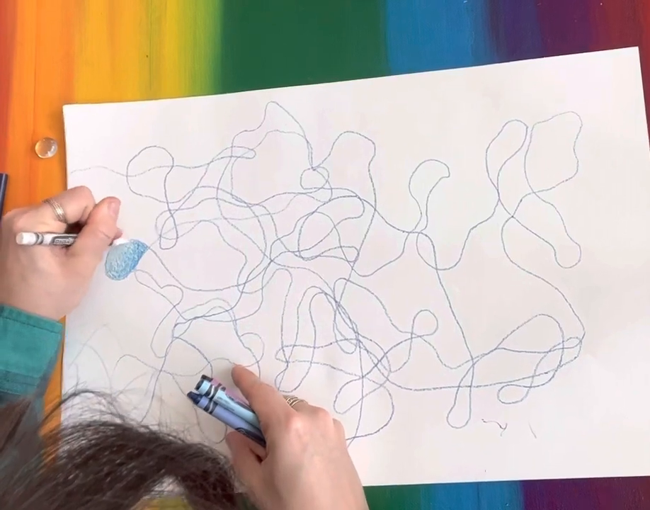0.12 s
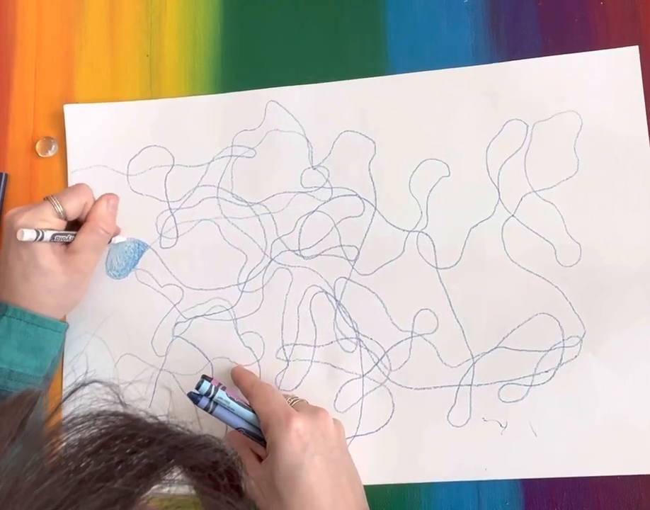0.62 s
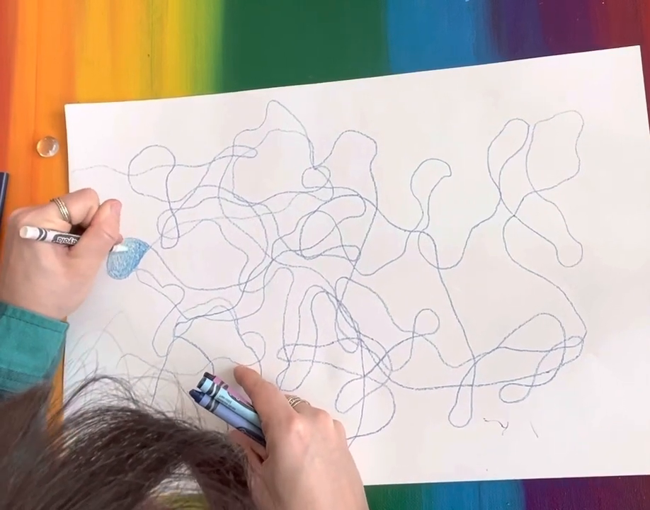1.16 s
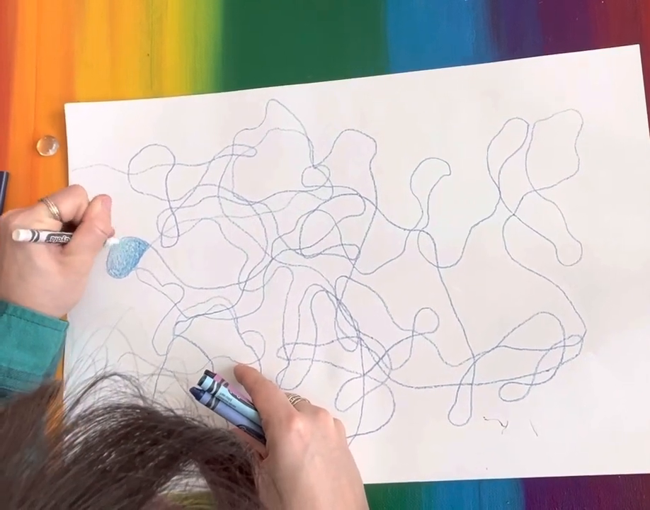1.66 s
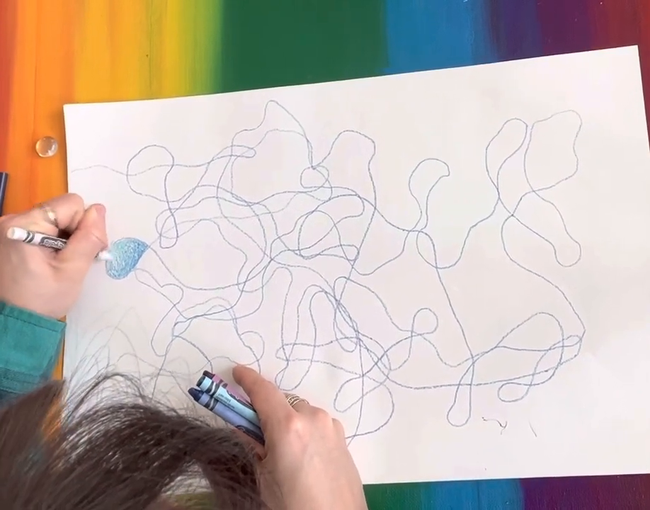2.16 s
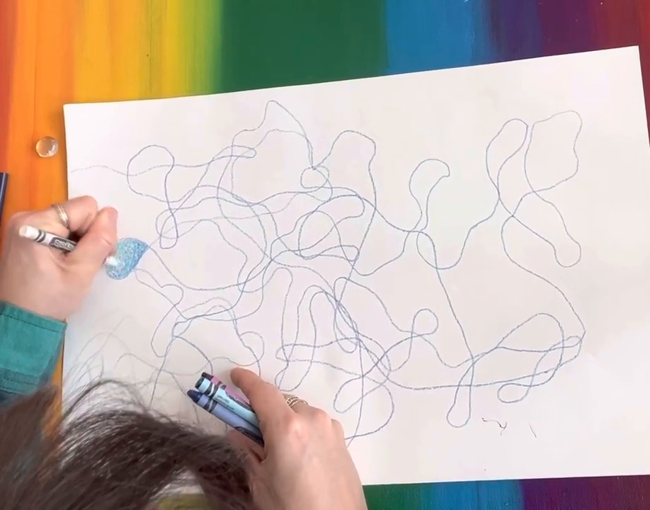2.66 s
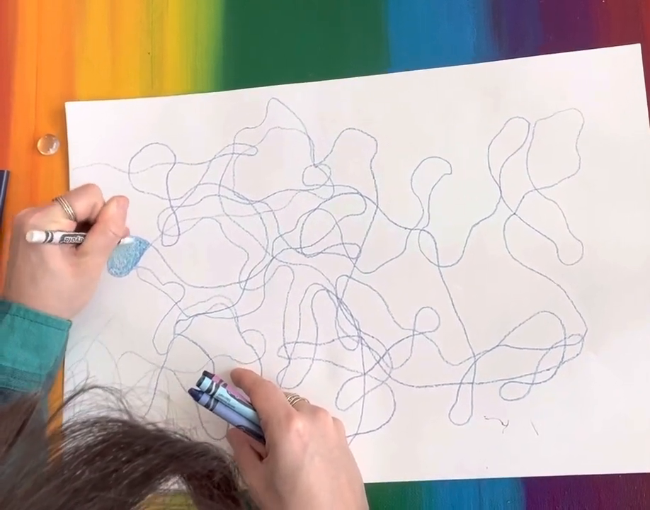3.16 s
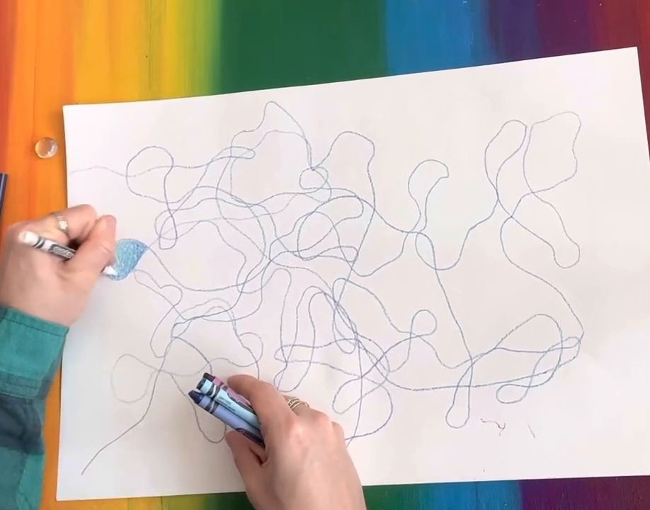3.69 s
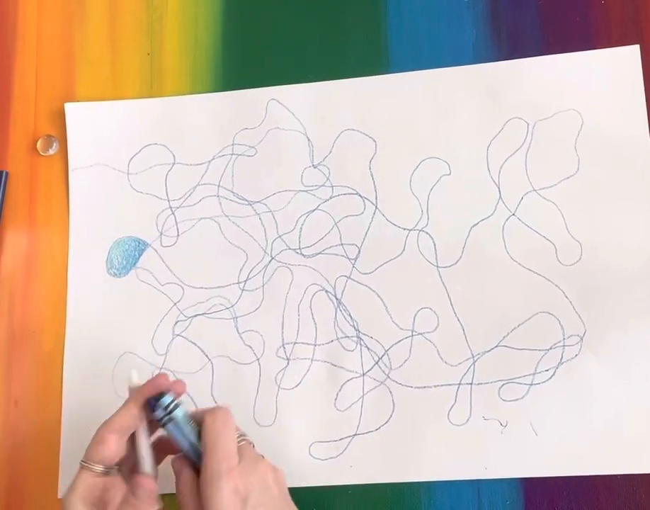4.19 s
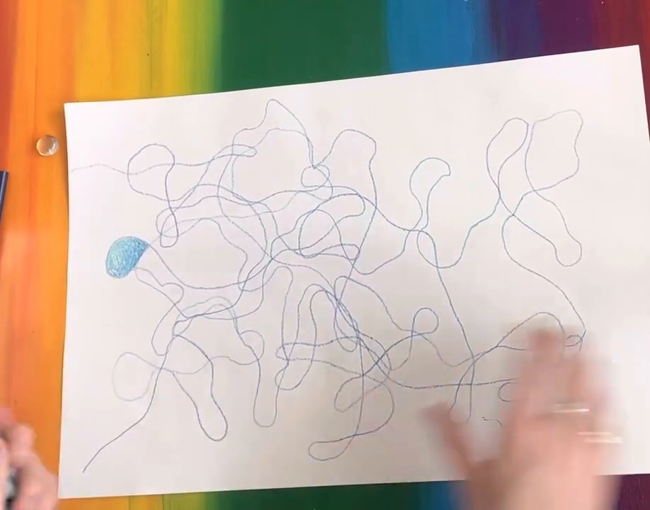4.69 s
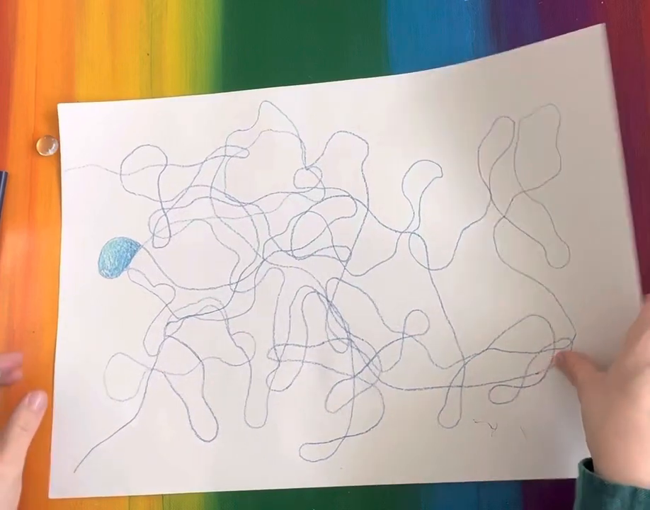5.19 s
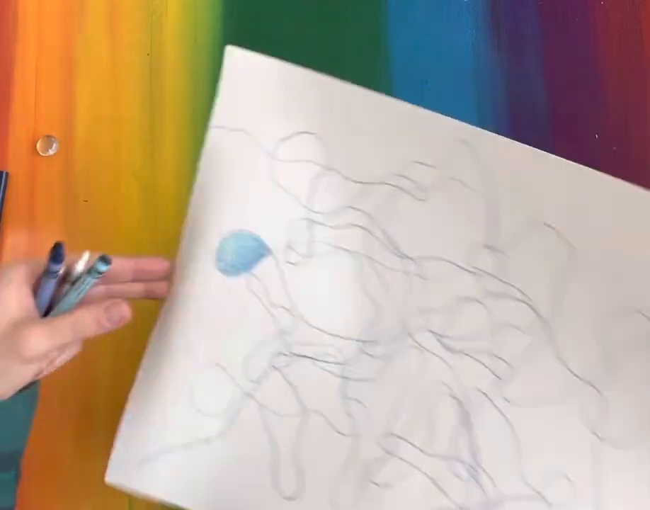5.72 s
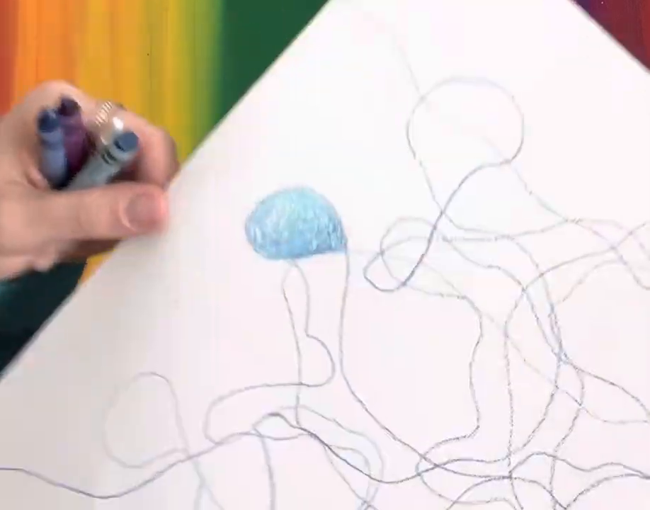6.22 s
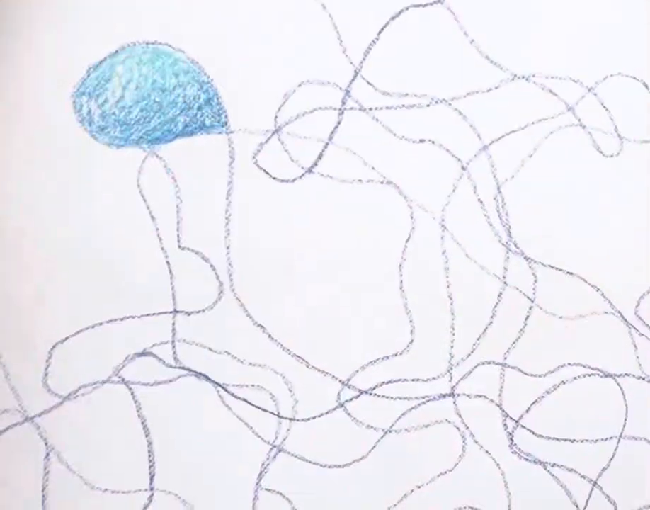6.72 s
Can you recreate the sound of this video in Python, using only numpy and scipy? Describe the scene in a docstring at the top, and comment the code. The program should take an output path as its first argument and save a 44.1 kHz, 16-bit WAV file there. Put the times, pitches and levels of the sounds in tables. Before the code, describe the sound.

A crayon shades paper in quick soft strokes with small wooden knocks, then crayons click in the hand and a sheet is slid, buckled and lifted.

```python
"""Crayon shading on a wooden table

A crayon shades a patch on a sheet lying on a wooden table, under a phone with two microphone ports.
Strokes are patchy hiss that follows the tip's speed; jolts of the table top ring its damped modes.
Then crayons click in the hand (short noise bands) and the sheet is grasped, slid, buckled and lifted
(coloured grainy noise). A low room rumble with a mains hum lies under it all."""
import sys
import numpy as np
from scipy import signal
from scipy.fft import rfft, irfft
from scipy.io import wavfile
from scipy.ndimage import uniform_filter1d

SR = 44100
rng = np.random.default_rng(int(sys.argv[2]) if len(sys.argv) > 2 else 0)


def log_audio(samples):
    """Write samples as a 16-bit WAV file to the path given in sys.argv[1]."""
    # one column per channel
    frames = np.atleast_2d(samples).T
    # limit to full scale, then quantise
    limited = np.clip(frames, -1, 1)
    pcm = np.round(limited * 32767).astype(np.int16)
    wavfile.write(sys.argv[1], SR, pcm)


def natural_amplitude(level_db):
    """Convert a level in decibels to a linear amplitude factor, elementwise."""
    exponent = np.asarray(level_db, float) / 20
    return 10 ** exponent


N = 302085
T = np.arange(N) / SR
F = np.maximum(np.fft.rfftfreq(N, 1 / SR), 1)

# The crayon jolts the table. Each row: time in seconds, level in dB before panning,
# place of the tip 0-3, brightness in dB per octave.
JOLTS = [(.089, -29, "0", 1.5), (.098, -35, "0", -4.5), (.111, -33, "0", 1), (.317, -40.5, "0", 1),
         (.341, -58.5, "1", -1), (.526, -41, "0", -2.5), (.54, -37, "0", 1.5), (0.555, -49.5, "1", 2),
         (.748, -40, "0", 1.5), (.756, -48, "0", -0.5), (.771, -50.5, "1", 0.5), (.82, -53, "3", 10),
         (.876, -64, "3", 15), (.985, -59, "3", 20), (1.018, -64.5, "3", 24), (1.163, -50, "3", -5),
         (1.226, -62, "3", -8), (1.368, -52.5, "3", -14), (1.544, -53, "3", 12), (1.717, -59, "3", 29),
         (1.745, -59, "2", 3), (1.908, -36.5, "2", -3.5), (1.934, -39.5, "2", 0), (2.079, -35.5, "2", 4.5),
         (2.104, -36, "2", 1.5), (2.287, -31.5, "2", -1.5), (2.308, -45, "2", 3), (2.334, -39, "2", -1.5),
         (2.501, -47.5, "2", 6), (2.63, -42.5, "0", -1), (2.654, -54, "1", 0.5), (2.816, -44.5, "2", 2),
         (2.897, -59.5, "3", 8), (2.993, -45.5, "2", 5), (3.159, -62, "3", 3), (3.237, -62, "2", -4),
         (4.905, -41, "2", -7), (4.945, -53, "1", -4)]
# Modes of the table top. Each row: frequency in Hz, t60 in seconds with no hand damping it,
# then relative strength in dB when pressed at place 0, 1, 2, 3.
TABLE_MODES = [(182.2, 0.17, -6, -14.5, -27, -30.5), (383, 0.4, -23, 1.5, -33, -24),
               (525.7, 0.059, 6.5, -20.5, -25.5, -2.5), (578.3, 0.16, -10.5, -1, -8, -21.5),
               (614.8, 0.16, -15, -27, 4, -5), (760, 0.15, -25, -1, -8, -14),
               (815, 0.39, -26, -12.5, -16.5, -22), (963, 0.086, -17, 13.5, -9.5, -6),
               (1262, 0.13, -37, -27, -30, -7), (1400, 0.1, -45, -28, -24, 2),
               (1613, 0.16, -21, -30, -14.5, -2.5), (1853, 0.08, -31, -15, -20.5, -20),
               (2020, 0.056, -23, -7.5, -21, -13), (2450, 0.078, -54, -14, -31, -35)]


def unit(x):
    """Scale to rms 1."""
    return x / np.sqrt(np.mean(x ** 2))


def along(table, hz):
    """Read a table on a log-frequency axis."""
    f, v = np.transpose(table)
    return np.interp(np.log(hz), np.log(f), v)


def over_time(table, *outside):
    """Read a table of seconds and dB along the whole scene, as gains."""
    return natural_amplitude(np.interp(T, *np.transpose(table), *outside))


def coloured(x, colour):
    """Give a sound a spectrum, rms 1."""
    return unit(irfft(rfft(x) * natural_amplitude(along(colour, F)), N))


def walk(rate):
    """Random levels held 1 / rate s and slewed twice."""
    k = int(SR / rate)
    held = np.repeat(rng.standard_normal(N // k + 1), k)
    return 2.01 * uniform_filter1d(uniform_filter1d(held, k), k)[:N]


def gritty(grit_db, patchy_db, rate):
    """Noise of paper fibres: grains of very unequal size in patches."""
    grit = np.minimum(rng.exponential(size=N), 2 * np.pi)
    return unit(rng.standard_normal(N) * natural_amplitude(grit_db * grit + patchy_db * walk(rate)))


def band(x, hz, octaves):
    """Keep a bell-shaped band of a sound."""
    f = np.maximum(np.fft.rfftfreq(len(x), 1 / SR), 1)
    bell = np.exp(-.5 * (np.log2(f / hz) / max(octaves, .03) * 2) ** 2)
    return irfft(rfft(x) * bell, len(x))


def add(track, s, x):
    """Mix a short sound in at s seconds."""
    i = int(s * SR)
    track[..., i:i + x.shape[-1]] += x[..., :N - i]


def pan(db):
    """Gains left and right, db apart."""
    return natural_amplitude(np.array([[db], [-db]]) / 2)


def hands(s):
    """Gains left and right of a sound that the hands make at s seconds."""
    # Where the hands work, seen from the phone. Each row: time in seconds, left minus right in dB.
    place = [(0, -0.5), (2.0, 6), (4.2, 1), (4.5, 7), (4.85, -3.5), (5.1, 1), (5.4, 3.5), (5.75, 5.5),
             (6.2, 11), (6.6, 5)]
    return pan(np.interp(s, *np.transpose(place)))


def ports(x, low_phase):
    """Left and right differ in phase, and a share of each is its own short, noise-like echo."""
    # Left and right phase above 4 kHz. Each row: Hz, radians by which left leads.
    treble_phase = [(6030, -5.1), (7060, -4.3), (7900, -3.15), (10500, -3.1), (12000, -1.2), (13100, 0),
                    (20000, 0)]
    # Share of unlike sound left and right, almost none near 8-10 kHz and above 13 kHz.
    # Each row: Hz, share (0-1).
    unlike = [(60, .12), (250, .3), (600, .25), (1300, .25), (2500, .8), (4100, .25), (5500, .5),
              (7000, .4), (8000, .04), (10300, .04), (11500, .5), (13200, .04)]
    x = np.broadcast_to(x, (2, N))
    turn = np.exp(.5j * along(low_phase + treble_phase, F) * np.array([[1], [-1]]))
    t = T[:SR // 4]
    echoes = rfft(rng.standard_normal((2, len(t))) * natural_amplitude(-60 * t / 0.11), N)
    echoes /= np.sqrt(np.mean(np.abs(echoes) ** 2))
    share = along(unlike, F)
    return irfft(rfft(x) * (np.sqrt(1 - share ** 2) * turn + share * echoes), N)


def murmur():
    """The rubbed board mutters: each octave comes and goes in its own patches."""
    # Each row: Hz, relative dB per Hz.
    colour = [(100, -6.5), (250, -0.5), (500, -3), (1000, -6), (2000, -29), (2500, -36.5), (4000, -42)]
    board = coloured(rng.standard_normal(N) * natural_amplitude(1.8 * rng.exponential(size=N)), colour)
    octaves_hz = 125 * 2 ** np.arange(6)
    return unit(sum(natural_amplitude(3.5 * walk(18)) * band(board, hz, 1.0) for hz in octaves_hz))


def room():
    """Sway, rumble and hum reach both ports nearly alike; board murmur and air are returned apart."""
    # Each row: time in seconds, sway of the table in dB, low rumble in dB,
    # murmur of the rubbed board in dB before panning.
    levels = [(0, -59.5, -49, -56), (.11, -46.5, -57, -46), (.23, -43.5, -50, -51.5), (.3, -63, -57.5, -57),
              (.45, -62, -63.5, -59), (.88, -57, -72, -57), (1.1, -71.5, -68.5, -68),
              (1.5, -70, -63.5, -67), (2.1, -62.5, -60.5, -61), (2.8, -62.5, -61, -58.5),
              (3.4, -67, -63.5, -64.5), (4.0, -69.5, -65.5, -71.5), (4.77, -64.5, -62.5, -79.5),
              (4.9, -54.5, -57.5, -47), (5.3, -65, -57.5, -58.5), (5.63, -63, -56.5, -67.5),
              (5.89, -61, -53, -49.5), (6.09, -57, -54, -53), (6.4, -66, -56.5, -73.5),
              (6.56, -61, -60, -65.5), (6.85, -64, -63, -86.5)]
    # Sway, rumble and air of the room. Each row: Hz, relative dB per Hz.
    sway_colour = [(20, -44.5), (33, -23), (42, -2), (52, 11.5), (65, 7.5), (90, -10.5), (150, -70.5)]
    rumble_colour = [(40, -34.5), (65, -12.5), (80, 10.5), (100, 2), (160, -2.5), (250, -11.5), (400, -58)]
    air_colour = [(300, -5.5), (1000, -9), (2600, -4), (4100, -7.5), (7000, -12.5), (10000, -9.5),
                  (13000, -14), (16000, -33.5)]
    # Mains hum. Each row: time in seconds, peak level in dB before a slight wander.
    hum_db = [(0, -70), (3.8, -65), (4.4, -61.5), (5.5, -56), (6.85, -58)]
    hum_hz, air_db = 121.5, -87.5

    s, *columns = np.transpose(levels)
    sway, rumble, rubbing = (natural_amplitude(np.interp(T, s, c)) for c in columns)
    noise = rng.standard_normal((2, 2, N))
    low, side = (sway * coloured(a, sway_colour) + rumble * coloured(b, rumble_colour) for a, b in noise)
    hum_level = over_time(hum_db) * natural_amplitude(0.3 * walk(2.7))
    hum = hum_level * np.sin(2 * np.pi * hum_hz * T + .5 * walk(2.2))
    air = natural_amplitude(air_db + 1.1 * walk(3.5)) * coloured(rng.standard_normal(N), air_colour)
    return low + 0.2 * side * np.array([[1], [-1]]) + hum, rubbing * murmur() + air


def whisper():
    """Paper wrappers rub on each other in the fist and sound in a few narrow bands."""
    # Each row: centre in Hz, relative level in dB, width in octaves.
    narrow_bands = [(3040, -6, 0.4), (4100, -1, 0.22), (6300, -6, 0.35)]
    # Each row: time in seconds, level in dB that the bands are relative to.
    level = [(3.75, -100), (3.85, -90), (4.2, -77.5), (4.35, -85), (4.45, -81.5), (4.6, -82), (4.75, -84.5),
             (4.85, -100)]
    noise = gritty(3.2, 1.5, 60)
    bands = sum(natural_amplitude(db) * unit(band(noise, hz, octaves)) for hz, db, octaves in narrow_bands)
    return over_time(level, -140, -140) * bands


def ticks():
    """Crayons and creases tick: a sharp click with a short noisy tail."""
    # Each row: time in seconds, relative level in dB, centre in Hz, t60 in seconds (3 ms at least),
    # width in octaves.
    clicks = [(.108, -26.5, 2470, 0.016, 1.4), (.111, -28.5, 714, 0.027, 1.1), (.112, -53, 3900, 0.26, 0.1),
              (.283, -40, 1390, 0.0045, 1.83), (.552, -47, 4830, 0.0051, 2.5),
              (.667, -62, 3950, 0.091, 1.2), (.855, -63, 9000, .018, 2.3), (0.869, -53.5, 7140, 0.034, 1.2),
              (1.142, -62, 2980, 0.069, 2.8), (1.542, -57, 1420, 0.048, .9),
              (1.912, -58.5, 1980, 0.29, 3.4), (2.071, -55, 1920, 0.17, 4), (2.28, -57, 2000, 0.36, 3.1),
              (2.499, -53.5, 1380, 0.23, 2.5), (2.987, -52.5, 4000, 0.049, 2.6),
              (3.632, -53, 490, 0.2, 2.7), (3.595, -60, 290, .2, .8), (3.788, -50, 377, 0.24, 1.52),
              (3.788, -57, 1000, .02, 1.2), (3.789, -46, 12000, 0.075, 1.7), (3.988, -63, 4030, 0.085, 1.1),
              (4.126, -51, 14500, 0.024, 0.94), (4.188, -52.5, 1450, 0.022, 0.86),
              (4.204, -59, 1400, 0.05, 0.94), (4.205, -56, 3670, 0.053, 0.84),
              (4.402, -60, 1120, 0.093, 0.88), (4.47, -60, 1290, 0.045, 0.5),
              (4.496, -60.5, 1280, 0.3, 0.74), (4.5548, -35.5, 2470, 0.0053, 1.72),
              (4.5554, -42, 6100, 0.0068, 0.11), (4.562, -58.5, 3070, 0.3, 0.51),
              (4.815, -47.5, 1080, 0.018, 0.92), (4.894, -37, 1190, 0.029, 0.9),
              (4.935, -45, 1490, .025, 0.46), (4.948, -42, 600, 0.016, 1), (4.866, -51.5, 10000, 0.018, 2),
              (4.883, -48.5, 10000, 0.012, 2.4), (4.941, -39.5, 8800, 0.14, 1.5),
              (4.972, -44.5, 5500, .015, 0.95), (5.014, -50, 6400, 0.16, 1.6),
              (5.097, -30.5, 3600, 0.017, 1.2), (5.111, -26, 3500, .015, 1.4),
              (5.123, -31.5, 3526, .015, 1.5), (5.139, -29, 3500, 0.02, 0.67), (5.153, -32, 4200, .012, 1),
              (5.261, -39.5, 990, 0.018, 0.43), (5.322, -45.5, 2000, .015, 2),
              (5.1612, -27.5, 3100, 0.0033, 0.5), (5.21, -31.5, 8900, 0.021, 4.5),
              (5.218, -51, 12900, .02, 1.9), (5.409, -14, 1645, 0.018, 1.15),
              (5.6915, -51, 3850, 0.028, 0.25), (5.7068, -25, 1377, 0.031, 1.35),
              (5.768, -38.5, 5820, .034, 1.2), (5.785, -26.5, 1600, .013, 1.1),
              (5.789, -20.5, 1306, .012, 1.18), (5.801, -37, 6030, 0.028, 1.06),
              (5.813, -13.5, 1130, 0.0083, 1.32), (5.8224, -18, 1500, 0.016, 0.69),
              (5.816, -27.5, 761, .15, 0.091), (5.84, -33, 1300, .03, 1.5),
              (5.846, -43.5, 6060, 0.044, 1.1), (6.065, -51.5, 2410, .06, .5), (6.186, -49, 800, .03, 1.3),
              (6.241, -52, 1200, .03, 2.1), (6.2277, -50.5, 12000, 0.031, 2.8),
              (6.597, -51.5, 5900, 0.014, 2.6), (6.597, -47, 5320, 0.014, 0.13),
              (6.598, -49, 3570, 0.035, 0.1)]
    out, t = np.zeros((2, N)), T[:7680]
    chance = rng.standard_normal((len(clicks), len(t)))
    for (s, db, hz, t60, octaves), noise in zip(clicks, chance):
        tail = noise * natural_amplitude(-60 * t / max(t60, .003))
        y = band(np.r_[np.zeros(511), 4.0, tail], hz, octaves)
        onset_rms = y[480:640].std()
        add(out, s - 512 / SR, natural_amplitude(db) * hands(s) * y / onset_rms / 2.8)
    return out


def buckles():
    """A run of uneven cracks while the fold travels, then a dull tail as it settles."""
    # Each row: time in seconds, rms level in dB before panning, centre in Hz,
    # length of the crackle in seconds, t60 in seconds (10 ms at least).
    folds = [(4.64, -76.5, 1030, 0.043, .08), (4.815, -53.5, 460, 0.0069, 0.2),
             (4.891, -41.5, 524, 0.018, 0.18), (5.095, -43, 1070, 0.073, 0.034),
             (5.095, -46.5, 3300, 0.078, .03), (5.259, -52, 1110, 0.047, 1),
             (5.407, -24, 1620, 0.0051, 0.013), (5.417, -33.5, 1040, 0.0025, 0.064),
             (5.545, -42.5, 880, 0.0075, 0.13), (5.71, -35.5, 854, 0.0066, 0.1),
             (5.792, -35.5, 1490, 0.019, 0.15), (5.802, -35, 1540, 0.022, 0.11),
             (5.811, -28, 847, 0.022, 0.16), (5.95, -51, 490, 0.059, 0.09),
             (6.02, -53.5, 604, 0.0091, 0.062), (6.166, -50.5, 550, 0.022, 0.26),
             (6.545, -66, 480, 0.025, 0.093), (6.64, -77.5, 900, 0.042, .1)]
    out, t = np.zeros((2, N)), T[:16384] - .02
    grains = gritty(2.0, 1.8, 150)
    for k, (s, db, hz, lasts, t60) in enumerate(folds):
        shape = np.clip(t / 0.0016, 0, 1) * natural_amplitude(-60 * np.maximum(t - lasts, 0) / max(t60, .01))
        crackle = grains[k * len(t) // 2:][:len(t)] * shape
        y = unit(band(crackle, hz, 1.234))
        add(out, s - .02, natural_amplitude(db) * hands(s) * y * np.sqrt(np.mean(shape ** 2)))
    return out


def sheet():
    """The flexing sheet rumbles to the left; edge and fingers scrape, and hiss more in harder slides."""
    # Hands rub the crayons, then the sheet is grasped, slid, let go and lifted.
    # Each row: time in seconds, flexing in dB before panning, sliding in dB.
    handling = [(3.68, -106, -88), (3.74, -89, -68), (3.8, -95, -82), (4.2, -74, -86), (4.4, -87, -85.5),
                (4.8, -81, -81), (4.85, -79, -81), (4.93, -51, -62.5), (4.98, -67, -94), (5.079, -81, -65),
                (5.101, -42, -40.5), (5.189, -48.5, -66), (5.208, -53.5, -43.5), (5.26, -61, -53.5),
                (5.3, -66, -46), (5.41, -57, -52.5), (5.46, -50.5, -46.5), (5.53, -50, -54),
                (5.569, -66, -65), (5.61, -52.5, -57), (5.66, -72, -80.5), (5.681, -75, -80),
                (5.705, -49.5, -52.5), (5.74, -47.5, -79), (5.76, -58, -66), (5.77, -50, -55.5),
                (5.82, -36, -69), (5.9, -49.5, -59), (5.95, -48.5, -59), (6.07, -54.5, -58.5),
                (6.1, -66, -61.5), (6.2, -57, -64.5), (6.23, -57, -63.5), (6.28, -66.5, -65),
                (6.34, -63.5, -55), (6.373, -55, -52.5), (6.411, -67.5, -65.5), (6.48, -82, -81.5),
                (6.85, -81.5, -88)]
    # Flexing, sliding and fine hiss. Each row: Hz, relative dB per Hz.
    flex_colour = [(120, -31), (250, 8), (600, 3), (1600, -0.5), (2300, -10.5), (4000, -28.5)]
    slide_colour = [(1000, -13.5), (2200, 1), (3000, -2.5), (3500, -2), (3950, 1.5), (4800, -7.5),
                    (7000, -5), (9500, -13), (12000, -22)]
    hiss_colour = [(6000, 0.5), (9000, 0.5), (12000, 4), (14000, -0.5), (16000, -13.5)]
    s, flex_db, slide_db = np.transpose(handling)
    hiss_db = -58.5 + 1.15 * (slide_db + 50)  # dB gained for each dB of sliding
    flex, slide, hiss = (natural_amplitude(np.interp(T, s, c, -120, -120)) for c in (flex_db, slide_db, hiss_db))
    flexing = flex * coloured(gritty(3.16, 2.0, 70), flex_colour)
    sliding = slide * coloured(gritty(2.8, 1.7, 180), slide_colour)
    hissing = hiss * coloured(gritty(2.7, 2.0, 60), hiss_colour)
    return flexing * pan(5) + sliding + hissing


def aftermath():
    """The tip keeps rubbing after every jolt and feeds the same table modes with faint noise."""
    # How readily the rubbing feeds each table mode, in dB, in the order of the modes.
    feed_db = [-6.5, 1.5, -4.5, 0, -8, 11, 18, 8, -0.5, -3, -11, -5.5, -4.5, -7.5]
    after_db, after_t60 = -22, 0.48  # dB against the jolt, seconds
    push = np.zeros((4, N))  # one for each place
    for s, db, place, _ in JOLTS:
        add(push[int(place)], s, natural_amplitude(db + after_db - 60 * T[:SR] / after_t60))
    noise = rfft(push * gritty(0.93, 2.0, 40))
    out = 0
    for (f, t60, *shape), db in zip(TABLE_MODES, feed_db):
        half_width = np.log(1000) / (2 * np.pi * t60)  # Hz
        resonance = np.sqrt(half_width * SR) / (half_width + 1j * (F - f)) / 4
        out = out + (natural_amplitude(db + np.array(shape)) @ noise) * resonance
    return irfft(out, N)


def rasp():
    """Wax rasps over the paper grain in fluttering bands, with a gritty scuff at every jolt."""
    # Each row: time in seconds, level of the steady rasp in dB.
    level = [(0, -70), (.35, -66), (.45, -74), (.8, -73), (1.2, -78), (1.8, -76.5), (2.4, -69), (3.0, -82),
             (3.15, -66), (3.65, -78), (3.75, -100)]
    # Each flutters alone. Each row: centre in Hz, relative level in dB before the flutter.
    flutter_bands = [(1000, -7), (1280, -1), (1450, -1.5), (1620, -4), (1820, 0.5), (2050, 1.5)]
    # Scuff level in dB against the jolt, at place 0, 1, 2, 3.
    scuff_db = [-32, -30, -29, -16]
    scuff_hz, scuff_t60 = 1500, 0.05  # Hz, seconds
    scuffs = np.zeros(N)
    for s, db, place, _ in JOLTS:
        add(scuffs, s - .004, natural_amplitude(db + scuff_db[int(place)] - 60 * T[:SR // 4] / scuff_t60))
    grain = gritty(4.8, 2.7, 35)
    flutter = sum(natural_amplitude(db + 4 * walk(25)) * unit(band(grain, hz, 0.1)) for hz, db in flutter_bands)
    steady = over_time(level, -140, -140) * unit(flutter)
    return steady + scuffs * unit(band(gritty(2.5, 2.5, 150), scuff_hz, 1.6))


def jolts():
    """A brief judder of the tip rings the table modes, each as strongly as it moves at that place."""
    # Time constant of the judder's build-up in seconds (1 ms at least), at place 0, 1, 2, 3.
    judder_s = [0.0058, 0.00084, 0.0036, 0.0025]
    # Share of t60 left where the resting hand damps the board, at place 0, 1, 2, 3.
    ring_share = [1, 1, 1, .6]
    # Frequency in Hz about which brightness pivots, at place 0, 1, 2, 3.
    pivot_hz = [525, 970, 615, 1400]
    out, t = np.zeros(N), T[:SR // 2]
    chance = rng.random((len(JOLTS), len(TABLE_MODES), 2))
    # the weight of the hand shifts each mode a little, in pitch (share) and strength (dB)
    detune, scatter_db = .016, 5
    # uneven contact makes each mode waver on its own
    waver = [natural_amplitude(1.8 * walk(60)) for _ in TABLE_MODES]
    for (s, db, place, bright_db), draws in zip(JOLTS, chance):
        i, k = int(s * SR), int(place)
        ring = 0
        for (f, t60, *shape), w, (p, q) in zip(TABLE_MODES, waver, draws):
            octaves = np.clip(np.log2(f / pivot_hz[k]), -1.5, 1.5 if k < 3 else .25)
            tilt_db = bright_db * octaves * (k < 3 or octaves > -.5)
            chance_db = scatter_db * (q - .5) * min(4 * abs(octaves), 1)
            mode_db = shape[k] + tilt_db + chance_db
            decay = natural_amplitude(mode_db - 60 * t / (t60 * ring_share[k]))
            tone = np.sin(2 * np.pi * (f * (1 + detune * (p - .5)) * t + p))
            ring = ring + decay * w[i:i + len(t)] * tone
        build_up = (1 - np.exp(-t / max(judder_s[k], .001))) ** 2
        add(out, s - .005, natural_amplitude(db) * ring * build_up)
    return out


def strokes():
    """Each stroke speeds up and slows down in step with the rhythm; its hiss follows the speed."""
    # Strokes of wax over paper. Each row: middle in seconds, relative level in dB.
    rubs = [(0.059, -71.5), (.16, -69), (.29, -68), (.404, -82), (.525, -65), (.64, -86), (.74, -84),
            (.873, -81), (.95, -72.5), (1.053, -73.5), (1.144, -68), (1.232, -73.5), (1.322, -75.5),
            (1.411, -70.5), (1.502, -73.5), (1.602, -70.5), (1.696, -67), (1.781, -71), (1.875, -68),
            (1.927, -60), (2.0, -91), (2.084, -61), (2.163, -73.5), (2.282, -60.5), (2.365, -74),
            (2.449, -70), (2.553, -69), (2.651, -66), (2.742, -68), (2.843, -64), (2.937, -70.5),
            (3.029, -63.5), (3.157, -73.5), (3.238, -69), (3.351, -75), (3.434, -67), (3.522, -65.5),
            (3.629, -70), (3.762, -72)]
    # Longer or separate rubbing hisses: crayon kept moving under the strokes, then fingers.
    # Each row: middle in seconds, relative level in dB, length in seconds.
    other_rubs = [(3.354, -83, 0.48), (3.909, -76, 0.12), (4.14, -78, 0.04), (4.516, -69.5, 0.13),
                  (4.696, -73.5, 0.065)]
    # Each row: Hz, relative dB per Hz.
    colour = [(300, 14), (1500, 12.5), (2500, 0.5), (4500, -7), (6500, 1.5), (8500, -13), (10800, 7.5),
              (12000, 1), (14000, 3.5), (16000, -10)]
    # The finest treble changes as wax fills the paper. Each row: time in seconds, gain in dB.
    treble_db = [(0, -1), (.45, -9), (.6, -5), (1.5, -3), (2.3, -6.5), (3.0, -6), (3.9, 2), (4.7, -6.5)]
    middle, dbs = np.transpose(rubs)
    lengths = 0.38 * np.gradient(middle)  # share of the time between strokes, the rest is turning
    rows = [*zip(middle, dbs, lengths), *other_rubs]
    speed = sum(natural_amplitude(db) * np.exp(-(2 * (T - s) / length) ** 2 * 0.52) for s, db, length in rows)
    hiss = coloured(gritty(2.9, 3.1, 73), colour)
    treble = irfft(rfft(hiss) * (F > 9500), N)
    return natural_amplitude(5.0) * speed * (hiss - treble + over_time(treble_db) * treble)


def scene():
    """Crayon, table and air on one side of the phone, the handled sheet on the other."""
    # Left and right phase below the treble. Each row: Hz, radians by which left leads.
    stroke_phase = [(200, 0), (620, -1.8), (860, -2.8), (1400, -5), (1650, -4.2), (2050, -4.8),
                    (2300, -4.1), (3450, -4.8), (4130, -6.1)]
    sheet_phase = [(200, 0), (600, -.7), (1000, -.3), (1900, -.5), (2300, -2), (2800, -5.2), (4130, -6.1)]
    low, air = room()
    handled = sheet() + whisper() + buckles() + ticks()
    drawing = strokes() + rasp() + pan(-5.0) * (jolts() + aftermath()) + pan(-3.5) * air
    return low + ports(drawing, stroke_phase) + ports(handled, sheet_phase)


def band_limit(x):
    """A steep low-pass at the top of the band."""
    return signal.sosfilt(signal.butter(12, 16500, fs=SR, output="sos"), x)


def record(dry):
    """The phone keeps the scene as its two ports hear it."""
    return band_limit(dry)


dry = scene()
out = record(dry)
log_audio(out)
```